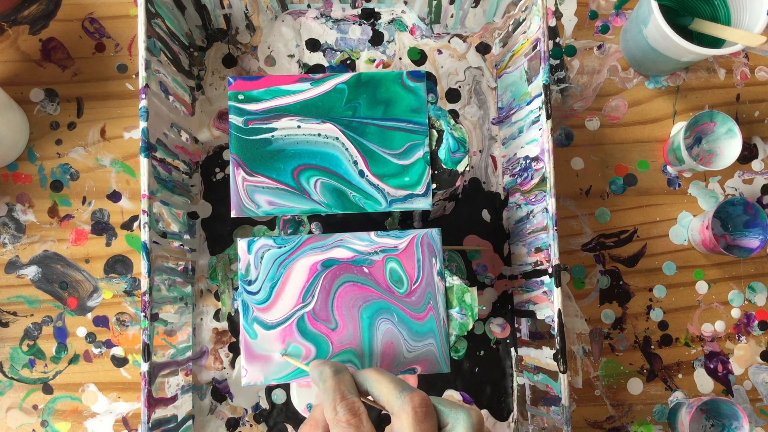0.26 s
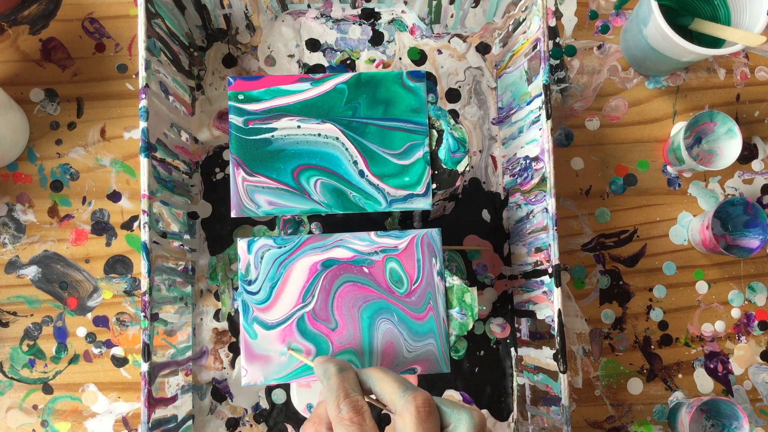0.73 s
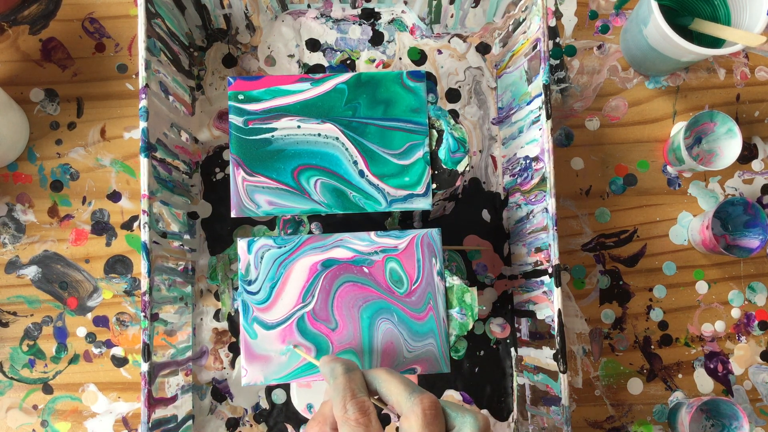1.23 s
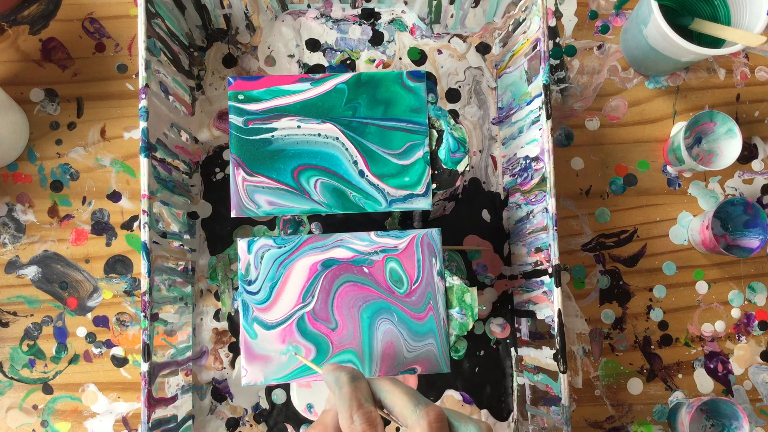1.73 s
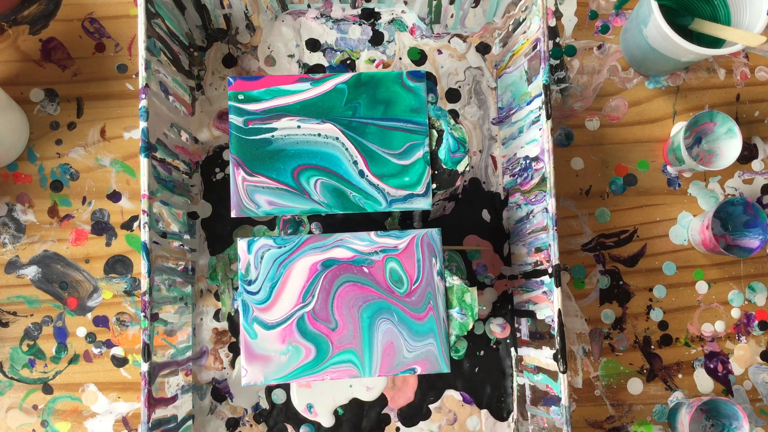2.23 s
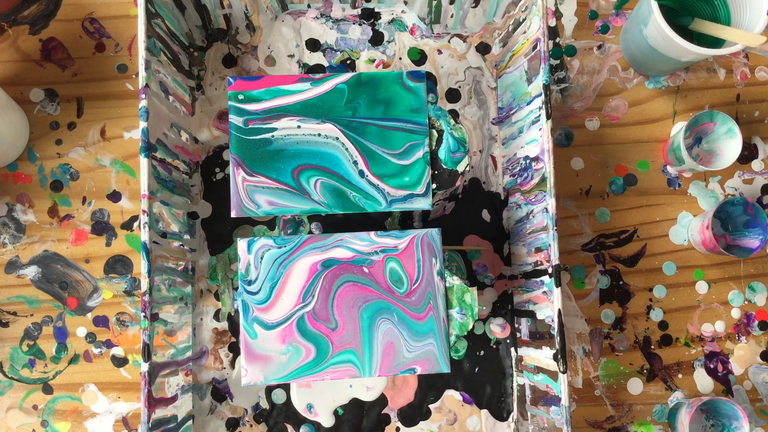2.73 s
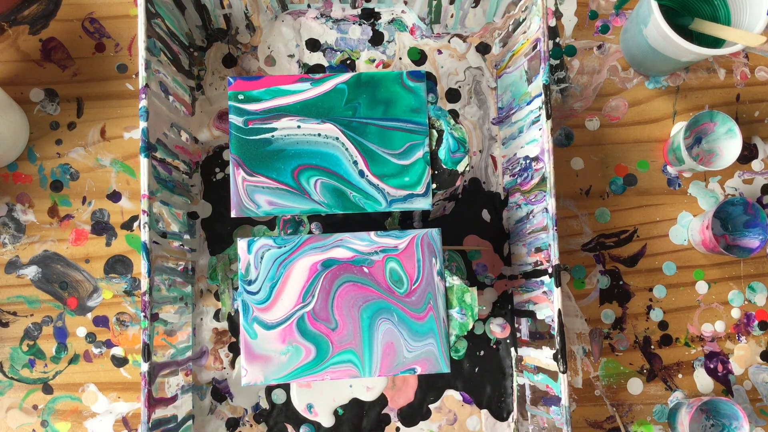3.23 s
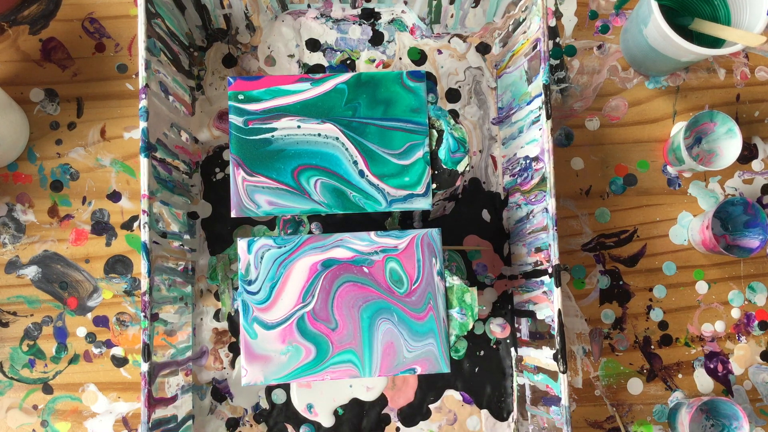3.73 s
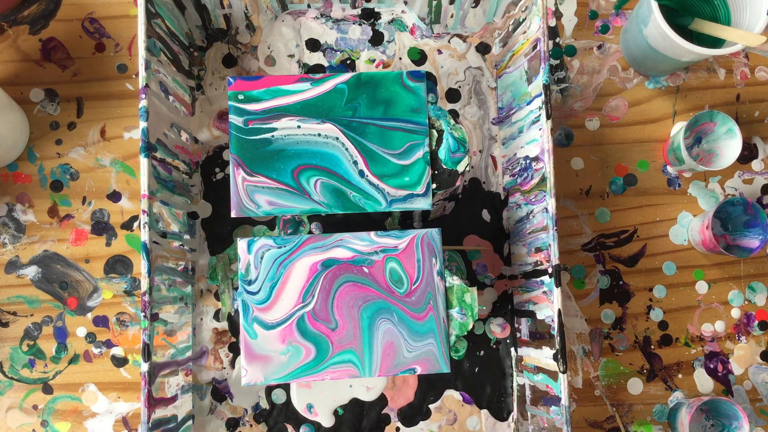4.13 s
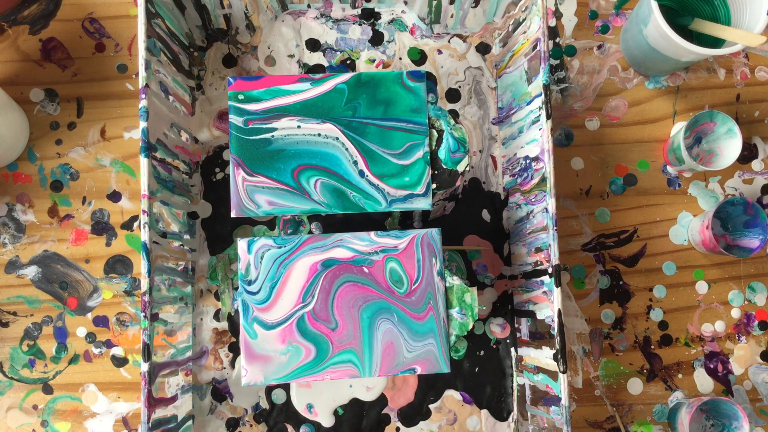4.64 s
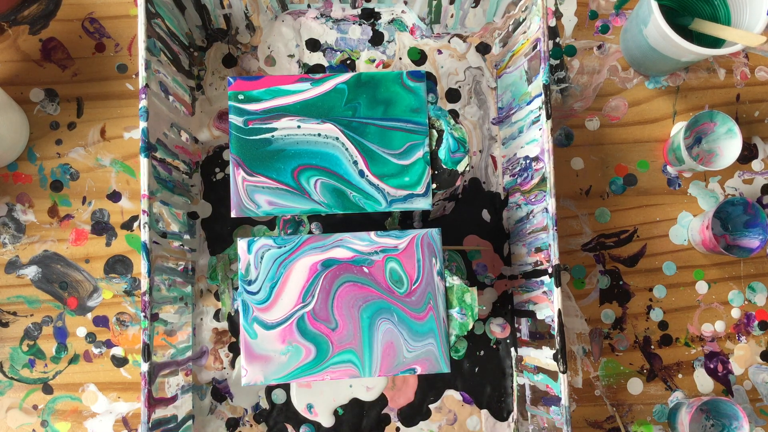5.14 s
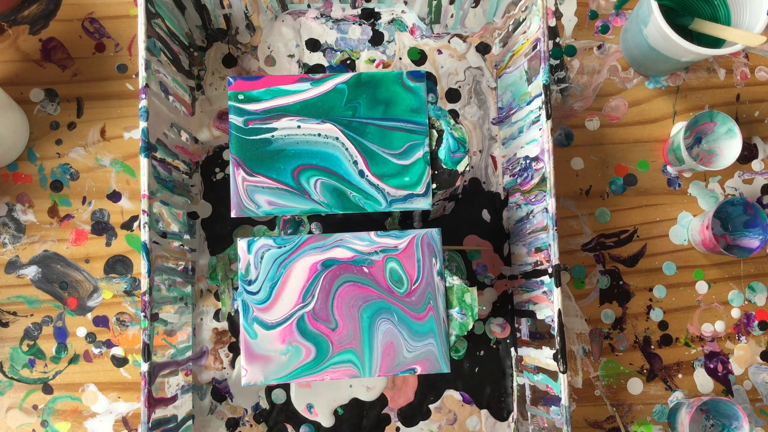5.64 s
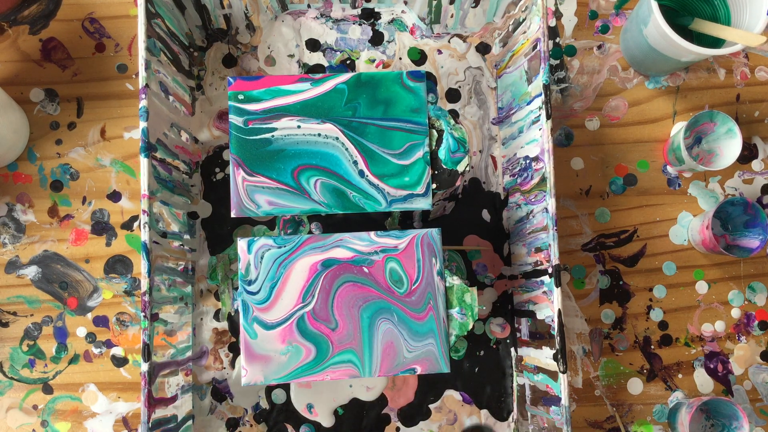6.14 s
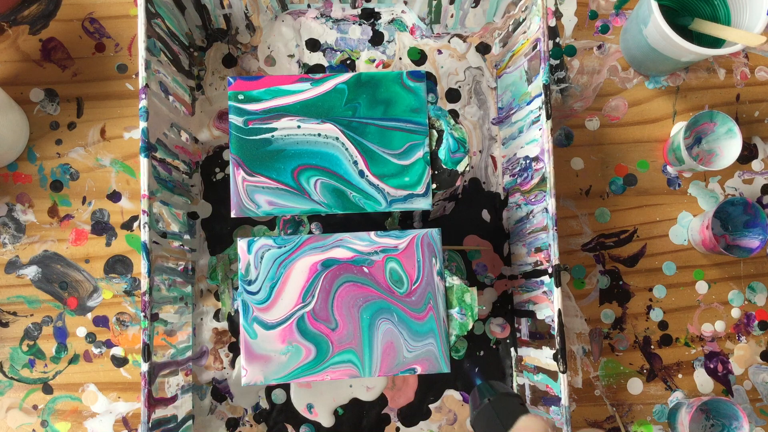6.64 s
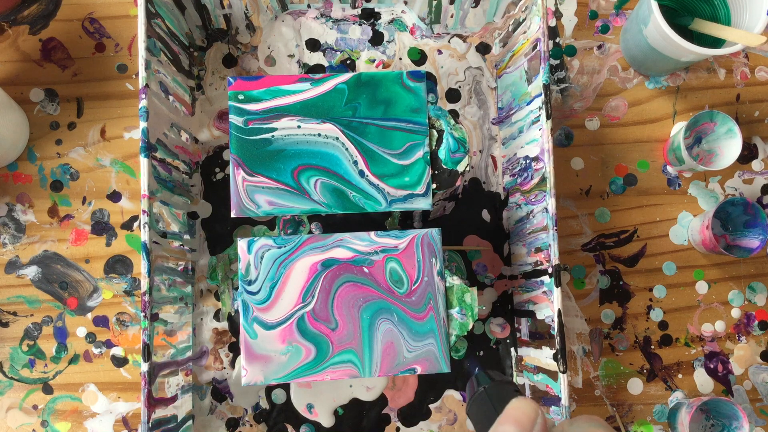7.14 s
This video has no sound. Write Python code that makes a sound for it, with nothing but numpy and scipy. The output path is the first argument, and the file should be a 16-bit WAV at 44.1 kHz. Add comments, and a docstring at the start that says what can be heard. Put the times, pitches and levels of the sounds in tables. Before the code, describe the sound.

In a quiet indoor craft space with a wavering low hum, a wooden stick knocks the table lightly twice and bounces. Small hard ticks follow as a gas torch is picked up, with barely audible finger scuffs and creaks of its casing. Then a very loud, sharp igniter snap lights the torch, which flares briefly and settles into a soft roar with thin hiss until the end. Close microphone, little room echo.

```python
"""A craft table in a quiet room with a wavering low hum, where a small gas torch is lit.
A stick knocks the table (dying sines); fingers scuff and creak on the torch (uneven noise, slips).
The trigger opens the gas, which hisses (coloured noise), and the spark hammer snaps (sharp blows
and ringing metal). The flame flares and settles (two coloured noises) over the hiss of the jet."""
import sys
import numpy as np
from scipy import signal
from scipy.io import wavfile
from scipy.ndimage import uniform_filter1d

SR = 44100
rng = np.random.default_rng(int(sys.argv[2]) if len(sys.argv) > 2 else 0)


def dump_mix(stems):
    """Bounce the given channels to the path in sys.argv[1] as a 16-bit WAV at rate SR."""
    frames = np.atleast_2d(stems).T  # one column per channel
    limited = np.clip(frames, -1, 1)  # hard clip at full scale
    pcm = np.round(limited * 32767).astype(np.int16)
    wavfile.write(sys.argv[1], SR, pcm)


def magnitude_from_level(level_db):
    """Linear magnitude for a level in decibels (20 dB per decade)."""
    exponent = np.asarray(level_db, float) / 20
    return 10 ** exponent


N = 325359  # length of the scene [samples]

# Still air: (frequency [Hz], level [dB per Hz])
AIR_COLOUR = [(18, -46), (34, -16), (60, -5), (85, -5.5), (147, -21), (181, -15), (212, -29), (339, -30),
              (451, -39), (585, -36.5), (911, -41), (1500, -42.5), (3000, -46.5), (6960, -50.5),
              (8200, -50.5), (9000, -47), (9800, -50.5), (15200, -50.5)]
# The wavering hum: (time [s], level [dB])
HUM_LEVEL = [(0, -70), (2.4, -68.5), (3.0, -63.5), (4.2, -66), (5.5, -73.5), (6.0, -85.5), (6.8, -68.5),
             (7.38, -72)]
# Low stirs of someone moving about: (loudest time [s], rise [s], fall [s], level [dB])
STIRS = [(1.67, 0.018, 0.058, -71), (3.51, 0.017, 0.27, -75), (4.35, 0.6, .6, -74.5),
         (5.66, 0.16, 0.049, -70)]
# Colour of those stirs: (frequency [Hz], level [dB per Hz])
STIR_COLOUR = [(60, -30), (120, 0), (250, -5), (400, -9), (600, -24), (900, -70)]
# Soft rustles of the moving hand and the trigger finger:
# (loudest time [s], rise [s], fall [s], level [dB])
RUSTLES = [(2.28, 0.24, 0.3, -81.5), (5.6, 0.19, 0.0494, -76)]
# Colour of those rustles: (frequency [Hz], level [dB per Hz])
RUSTLE_COLOUR = [(200, -50), (600, 0), (2200, -5), (4000, -15.5), (9000, -60.5)]
# How the room dies away: (frequency [Hz], time to fall 60 dB [s])
WALL_DECAY = [(100, 0.27), (400, 0.11), (1500, 0.43), (5000, 0.42), (10000, 0.35), (15000, 0.12)]
# A stick knocks the table twice and bounces: (time [s], level [dB], tilt [dB per octave],
# share of edge tick [ratio], table thud [Hz], thud level [dB])
STICK_TAPS = [(1.660, -55.5, 6, 0.2, 343, -54), (1.675, -75, 0, .05, 383, -63),
              (1.69, -63, 7, 0.03, 335, -74), (1.721, -66, 7, 0.03, 335, -78),
              (1.968, -52.5, 1, 0.35, 440, -60), (1.996, -59, 4, 0.03, 450, -76),
              (2.018, -67, 8, .03, 450, -80), (2.036, -66, 5, 0.03, 450, -80),
              (2.09, -80, -2, 0.05, 350, -67)]
# Tones of the stick: (frequency [Hz], level [dB], time to fall 60 dB [s])
STICK_TONES = [(560, -10, .03), (760, 0.5, 0.045), (950, -13, 0.034), (1190, -4, 0.06), (1270, -12, 0.03),
               (2250, -15, 0.025), (2730, -13, 0.022), (3550, -16, 0.02)]
# Dull bumps of the torch against the table: (time [s], level [dB], frequency [Hz])
BUMPS = [(3.016, -62, 1100), (3.508, -64, 900), (3.509, -65, 258), (3.523, -69, 750), (3.535, -67, 1100),
         (3.587, -73, 850)]
# Hard ticks of the torch being picked up:
# (time [s], peak level [dB], tilt [dB per octave], share of rattle [ratio])
TICKS = [(2.947, -63, -5, .6), (3.0142, -43, 0, 0.45), (3.5062, -60.5, -2.5, .5)]
# Colour of a hard tick: (frequency [Hz], level [dB per Hz])
TICK_COLOUR = [(410, -33), (700, -15), (1160, -6), (1600, -9), (2400, -9), (3000, -4), (4200, -4),
               (5000, -9), (7220, -7), (10500, -11), (12600, -6), (13200, -2), (13700, 5), (14200, -5),
               (15500, -25.5)]
# Fingers slide on the casing: (time [s], length [s], level [dB], tilt [dB per octave])
SCUFFS = [(3.512, .03, -75, -2), (3.635, .03, -75, 1), (3.675, .04, -74, 1.5), (3.782, .062, -71, 4),
          (4.085, .035, -82, 1.5), (4.49, .055, -78, -1), (4.63, .045, -82, -1.5), (4.86, .05, -79, -.3)]
# The casing creaks in the grip: (time [s], length [s], middle level [dB], nominal slips [per s])
CREAKS = [(3.65, .005, -78, 420), (3.697, .005, -79, 420), (4.307, .02, -73, 420), (4.478, .066, -74, 420),
          (4.628, .045, -72, 420), (4.85, .001, -57, 420)]
# Tones of the casing: (frequency [Hz], level [dB], time to fall 60 dB [s])
CASING_TONES = [(1560, 0, .035), (1680, -5, .025), (3000, -20, .012)]
# Scraping spring: (frequency [Hz], width [Hz], level [dB])
SPRING_BANDS = [(6400, 830, -0.5), (3950, 820, -3), (2720, 700, -6.5)]
# Sharp hammer blow: (frequency [Hz], level [dB per Hz])
SNAP_COLOUR = [(35, -45), (60, -28), (440, -27), (999, -20), (2000, -10), (2740, -9), (3890, -9),
               (4800, -16), (5150, -13), (6670, -2), (7320, -12.5), (11500, -6.5), (15100, -16.5),
               (15700, -56.5)]
# The blow in the plastic body: (frequency [Hz], level [dB per Hz])
BODY_COLOUR = [(35, -30), (60, 1), (250, 0), (480, 3), (850, -2), (1700, 2), (2500, -4), (5000, -40.5)]
# Ringing metal of the torch: (frequency [Hz], level [dB], time to fall 60 dB [s])
TORCH_TONES = [(2794, -2.5, 0.09), (3590, -11.5, 0.0717), (5940, 1, 0.035), (6840, -5, 0.06),
               (8397, -16.5, 0.13), (10610, -8.5, 0.029), (11440, -15.5, 0.062), (12330, -10, 0.056),
               (13250, -8.5, 0.0368)]
# Brief ping of the hammer pin: (frequency [Hz], level [dB], time to fall 60 dB [s])
PIN_TONES = [(12300, 0, .0035)]
# Hiss of the jet: (frequency [Hz], level [dB per Hz])
JET_COLOUR = [(2350, -40), (3050, -34), (3400, -16), (4000, -12.5), (4750, -7.5), (5090, 2), (5500, -8),
              (6470, -17.5), (7660, -20), (9960, -18.5), (15200, -23.5)]
# Thin top of the hiss: (frequency [Hz], level [dB per Hz])
JET_TOP_COLOUR = [(8000, -40), (9600, -17), (10600, -5.5), (12200, 0.5), (13600, -0.5), (15200, -5.5)]
# Cold gas in the air holes: (frequency [Hz], level [dB per Hz])
UNLIT_COLOUR = [(290, -31), (500, -2.5), (1030, -0.5), (1540, 3), (3400, -17.5), (5150, -6.5), (6210, -9),
                (6780, -7), (10000, -7.5), (13000, -39), (22000, -120)]
# The first flare of the flame: (frequency [Hz], level [dB per Hz])
FLARE_COLOUR = [(120, -48.5), (200, -14), (288, -14), (591, -11.5), (720, -2), (1020, -11.5), (1230, 1.5),
                (1400, -3.5), (1620, -10), (2050, -5.5), (2500, -11.5), (2800, -14), (3200, -12),
                (3900, -17), (9000, -30), (11700, -57.5), (19800, -120)]
# The settled flame: (frequency [Hz], level [dB per Hz])
SETTLED_COLOUR = [(88, -34), (150, -6), (183, -7.5), (211, -13.5), (268, -7.5), (317, -11.5), (360, -5.5),
                  (404, -11.5), (445, -7), (520, -19.5), (681, -2), (762, -2.5), (878, -1), (1120, -2),
                  (1250, -10), (1400, -4), (1590, -8), (1810, -2.5), (1970, -9.5), (2400, -15),
                  (2720, -8.5), (2960, -25.5), (3320, -15.5), (3610, -21.5), (4400, -25), (5720, -52),
                  (9680, -120)]

AIR_DB, STIR_REST_DB = -68, -85
HUM_HZ, HUM_WIDTH_HZ = 81.2, 7
SWELL_DB = 14  # a swell is this far under its top one rise before and one fall after it
TAIL_TURN_S = 0.005  # pace at which the three room tails take turns
THUD_T60_S, BUMP_T60_S, KNOCK_RISE_S = 0.057, 0.027, 0.0024
TICK_BURST_T60_S, TICK_TAIL_T60_S = 0.016, 0.23
TICK_TAIL_DB = -21.5  # relative to its tick
SLIP_SPREAD_DB = 2.5
VALVE_S, VALVE_OPENS_S, GAS_BUILDS_S = 5.594, 0.0096, 0.3
COLD_GAS_DB, LIT_GAS_DB = -73.5, -69.5  # start and end of the build-up
UNLIT_DB, JET_TOP_DB = 4, 5.5  # relative to the main hiss
JET_TOP_CLIMB_PER_S = 0.06  # the thin top slides up as the torch turns
CREEP_DB, CREEP_DB_PER_S, CREEP_HOLD_S = -34.5, 2600.5, 0.0061
HAMMER_S, HAMMER_DB, HAMMER_TILT_DB = 5.7058, -2.5, 2.5  # tilt per octave
CHATTER_FROM_S, CHATTER_TO_S = 0.001, 0.004  # after the blow
REBOUND_DB, REBOUND_TILT_DB = -12.5, 1  # middle values; each rebound strays from them
SNAP_RATTLE = 0.3  # share of rattle behind a blow
RING_DB, PIN_DB = -13.5, -4  # the ring is relative to the hammer
BODY_AFTER_S, BODY_DB = 0.0008, -17.5
FLARE_DB, SETTLED_DB = -53.5, -56
SETTLES_S, SETTLING_S, FLARE_LEFT = 5.99, 0.13, 0.01  # the last is a share of power
# the bands slide up as the torch moves over the table and its reflection shifts
FLARE_CLIMB_PER_S = 0.41
FLARE_DULLS_DB_PER_S = -28  # per octave above 4 kHz: the flare loses its treble first
FLUTTER_DB, FLUTTER_S, JET_FLUTTER_SHARE = 1.05, 0.04, 0.67
AWAY_S, AWAY_DB_PER_S = 5.77, -3  # the torch is turned aside and fades a little


def evened(x):
    """Scales a sound to an average strength (rms) of 1."""
    return x / np.sqrt(np.mean(x ** 2) + 1e-20)


def read(points, hz):
    """Reads a colour or decay table on a log-frequency axis."""
    f, value = np.transpose(points)
    return np.interp(np.log(hz + 1), np.log(f + 1), value)


def add(mix, s, sound):
    """Mixes a sound in at s seconds."""
    part = mix[round(s * SR):][:len(sound)]
    part += sound[:len(part)]


def noise(colour, patchy_db, size=1024, climb=0, dulls_db=0, moves_s=0):
    """Noise from random spectra with drifting patches; its colour may climb and dull after the blow."""
    hz = np.fft.rfftfreq(size, 1 / SR)[:, None]
    a, b, patches = rng.standard_normal((4 * N // size + 5, len(hz), 3)).T
    patches = uniform_filter1d(patches, size=10, axis=0)
    patches = evened(uniform_filter1d(patches, size=12, axis=1))
    frame_s = np.arange(a.shape[1]) * size / 4 / SR
    lit_s = np.clip(frame_s - HAMMER_S, 0, moves_s)
    dulled_db = dulls_db * lit_s * np.log2(np.maximum(hz, 4000) / 4000)
    level_db = read(colour, hz / (1 + climb * lit_s)) + dulled_db + patchy_db * patches
    spectra = (a + 1j * b) * magnitude_from_level(level_db)
    return evened(signal.istft(spectra, nperseg=size, noverlap=3 * size // 4)[1][:N])


def coloured(x, colour, tilt_db):
    """Filters without pre-echo: a colour, tilted per octave about 4 kHz (no further below 500 Hz)."""
    hz = abs(np.fft.fftfreq(4096, 1 / SR))
    log_gain = np.log(magnitude_from_level(read(colour, hz) + tilt_db * np.log2(np.maximum(hz, 500) / 4000)))
    minimum_phase = np.exp(np.conj(signal.hilbert(log_gain)))
    taps = np.fft.ifft(minimum_phase).real[:2048]
    return signal.fftconvolve(x, taps)


def ring(modes, tilt_db=0):
    """Dying sines of a struck thing, peak 1."""
    t = np.arange(SR // 4) / SR
    x = np.zeros(len(t))
    for hz, db, t60 in modes:
        fade = magnitude_from_level(db + tilt_db * np.log2(hz) - 60 * t / np.clip(t60, 0.0015, 0.3))
        x += fade * np.sin(2 * np.pi * hz * t)
    return x / abs(x).max()


def knock(modes, tilt_db=0):
    """A ring with the soft start of a dull blow."""
    x = ring(modes, tilt_db)
    return x * np.minimum(np.arange(len(x)) / SR / KNOCK_RISE_S, 1)


def crack(t60, colour, tilt_db, rattle):
    """One sharp blow with a little dying rattle behind it, peak 1."""
    t = np.arange(1000) / SR
    blow = rattle * rng.standard_normal(1000) * magnitude_from_level(-60 * t / t60)
    blow[0] = 1
    x = coloured(blow, colour, tilt_db)
    return x / abs(x).max()


def gritty(length, spread_db):
    """Noise that jumps in strength every 40 samples."""
    jumps = np.repeat(rng.exponential(1, length // 40), 40)
    return rng.standard_normal(length) * magnitude_from_level(spread_db * jumps)


def resonate(x, hz, width):
    """Picks out a band: shifts hz down to zero, smooths twice, shifts back."""
    turn = np.exp(2j * np.pi * hz * np.arange(len(x)) / SR)
    r = np.exp(-np.pi * width / SR)
    smooth = signal.lfilter([(1 - r) ** 2], [1, -2 * r, r * r], x / turn)
    return 2 * (turn * smooth).real


def swells(rows):
    """Gain of swells that rise and fall evenly in dB."""
    t = np.arange(N) / SR
    gain = np.zeros(N)
    for s, rise, fall, db in rows:
        gain += magnitude_from_level(db - SWELL_DB * np.maximum((s - t) / rise, (t - s) / fall))
    return gain


def still_air():
    """The faint steady noise of the room."""
    return magnitude_from_level(AIR_DB) * noise(AIR_COLOUR, 1.2, size=4096)


def low_hum():
    """A fuzzy hum: noise squeezed into a narrow band, wavering in level."""
    s, db = np.transpose(HUM_LEVEL)
    hum = evened(resonate(rng.standard_normal(N), HUM_HZ, HUM_WIDTH_HZ))
    return magnitude_from_level(np.interp(np.arange(N) / SR, s, db)) * hum


def movement():
    """Low swelling noise of someone moving about, and brighter rustles of hand and trigger finger."""
    stir = (magnitude_from_level(STIR_REST_DB) + swells(STIRS)) * noise(STIR_COLOUR, 4.01, size=2048)
    return stir + swells(RUSTLES) * noise(RUSTLE_COLOUR, 1.4)


def walls(x):
    """Three tails of sparse random taps take turns, each band dying at its own speed."""
    out = np.zeros(N)
    turn = np.pi * np.arange(N) / SR / TAIL_TURN_S
    for k in range(3):
        taps = np.zeros(SR // 2)
        at = np.arange(200, len(taps) - 10, 10)
        taps[at + rng.integers(0, 10, len(at))] = rng.choice([-1., 1.], len(at))
        hz, t, z = signal.stft(taps, SR, nperseg=256)
        fade = magnitude_from_level(-60 * t / read(WALL_DECAY, hz)[:, None])
        tail = signal.istft(z * fade, SR, nperseg=256)[1]
        share = np.sqrt(2 / 3) * abs(np.cos(turn + k * np.pi / 3))
        out += signal.oaconvolve(x * share, tail / np.linalg.norm(tail))[:N]
    return out


def stick_taps():
    """The stick rings, the table thuds and the stick's edge ticks."""
    out = np.zeros(N)
    for s, db, tilt_db, edge, thud_hz, thud_db in STICK_TAPS:
        add(out, s, magnitude_from_level(db) * knock(STICK_TONES, tilt_db))
        add(out, s, magnitude_from_level(thud_db) * knock([(thud_hz, 0, THUD_T60_S)]))
        add(out, s, magnitude_from_level(db) * edge * crack(0.018, TICK_COLOUR, -2.4, 0.8))
    return out


def bumps():
    """The torch bumps the table: one soft-starting, dying sine each."""
    out = np.zeros(N)
    for s, db, hz in BUMPS:
        add(out, s, magnitude_from_level(db) * knock([(hz, 0, BUMP_T60_S)]))
    return out


def ticks():
    """Sharp ticks of the torch, each followed by a bright, gritty tail that dies away."""
    out = np.zeros(N)
    for s, db, tilt_db, rattle in TICKS:
        add(out, s, magnitude_from_level(db) * crack(TICK_BURST_T60_S, TICK_COLOUR, tilt_db, rattle))
        grit = gritty(9000, 2.3)
        fade = magnitude_from_level(db + TICK_TAIL_DB - 60 * np.arange(9000) / SR / TICK_TAIL_T60_S)
        add(out, s, fade * evened(coloured(grit, TICK_COLOUR, tilt_db)[:9000]))
    return out


def scuffs():
    """Fingers rub the casing: short strokes of grit, as skin catches unevenly."""
    out = np.zeros(N)
    for s, length, db, tilt_db in SCUFFS:
        stroke = signal.windows.tukey(round(max(length, 0.005) * SR), 0.6)
        rub = coloured(gritty(8000, 2.1), [(300, -17), (1200, 2.5), (15000, -11.5)], tilt_db)
        add(out, s, magnitude_from_level(db) * stroke * evened(rub[3000:8000])[:len(stroke)])
    return out


def creaks():
    """Uneven stick-slip rings the casing."""
    out = np.zeros(N)
    # a soft pad of skin lets go
    release = np.hanning(90) * np.cos(2 * np.pi * CASING_TONES[0][0] * np.arange(90) / SR)
    slip = np.convolve(ring(CASING_TONES)[:2000], release)
    slip = slip / abs(slip).max()
    for s, length, db, rate in CREAKS:
        gap, size = rng.uniform(-1.2, 1, (40, 2)).T
        slips = np.cumsum(1 + 0.2 * gap) / rate
        for at, big in zip(slips - slips[0], size):
            if at < length:
                add(out, s + at, magnitude_from_level(db + SLIP_SPREAD_DB * big) * slip)
    return out


def spring():
    """The spring creeps: scraping noise in a few bands climbs, then holds until the blow."""
    before = HAMMER_S - np.arange(N) / SR
    creep = (before > 0) * magnitude_from_level(CREEP_DB - CREEP_DB_PER_S * np.maximum(before - CREEP_HOLD_S, 0))
    scrape = rng.standard_normal(N)
    bands = sum(magnitude_from_level(db) * resonate(scrape, hz, width) for hz, width, db in SPRING_BANDS)
    return creep * evened(bands)


def hammer():
    """The hammer cracks and chatters; the blow rings the metal, pings the pin and knocks the body."""
    out = np.zeros(N)
    late, size, tilt = rng.uniform(-1, 1, (6, 3)).T
    after = np.interp(np.arange(6) + 0.49 * late, [0, 5], [CHATTER_FROM_S, CHATTER_TO_S])
    rebounds = zip(after, REBOUND_DB + 3 * size, REBOUND_TILT_DB + 2.3 * tilt)
    for s, db, tilt_db in [(0.00066, HAMMER_DB, HAMMER_TILT_DB), *rebounds]:
        add(out, HAMMER_S + s, magnitude_from_level(db) * crack(0.004, SNAP_COLOUR, tilt_db, SNAP_RATTLE))
    add(out, HAMMER_S + BODY_AFTER_S, magnitude_from_level(BODY_DB) * crack(0.014, BODY_COLOUR, 0, 0.17))
    add(out, HAMMER_S, magnitude_from_level(HAMMER_DB + RING_DB) * ring(TORCH_TONES))
    add(out, HAMMER_S, magnitude_from_level(PIN_DB) * ring(PIN_TONES))
    return out


def gas_pop():
    """The gas pops alight: one low dying sine."""
    out = np.zeros(N)
    t = np.arange(4000) / SR
    add(out, HAMMER_S, magnitude_from_level(-46.5) * np.sin(2 * np.pi * 110 * t) * magnitude_from_level(-60 * t / 0.087))
    return out


def gas_jet(t, lit):
    """Gas hisses once the valve opens; the cold-gas noise goes as the flame lights."""
    opened = np.clip((t - VALVE_S) / VALVE_OPENS_S, 0, 1)
    built = np.clip((t - VALVE_S) / GAS_BUILDS_S, 0, 1)
    gas = opened * magnitude_from_level(COLD_GAS_DB + (LIT_GAS_DB - COLD_GAS_DB) * built)
    top = magnitude_from_level(JET_TOP_DB) * noise(JET_TOP_COLOUR, 1.2, climb=JET_TOP_CLIMB_PER_S, moves_s=N / SR)
    cold = magnitude_from_level(UNLIT_DB) * (1 - lit) * noise(UNLIT_COLOUR, 0.94)
    return gas * (noise(JET_COLOUR, 1.6) + top + cold)


def flame(t):
    """The roar flares, then gives way to the settled flame by sharing out power."""
    share = np.clip(1 - (t - SETTLES_S) / SETTLING_S, FLARE_LEFT, 1)
    flare = noise(FLARE_COLOUR, 1.2, climb=FLARE_CLIMB_PER_S, dulls_db=FLARE_DULLS_DB_PER_S,
                  moves_s=SETTLES_S + SETTLING_S - HAMMER_S)
    settled = noise(SETTLED_COLOUR, 1.5, size=2048)
    return magnitude_from_level(FLARE_DB) * np.sqrt(share) * flare + magnitude_from_level(SETTLED_DB) * np.sqrt(1 - share) * settled


def torch():
    """Jet and flame flicker together, the jet less, and fade a little as the torch turns aside."""
    t = np.arange(N) / SR
    lit = np.clip((t - HAMMER_S) / 0.03, 0, 1)
    away = magnitude_from_level(AWAY_DB_PER_S * np.maximum(t - AWAY_S, 0))
    drift = uniform_filter1d(rng.standard_normal(N), round(FLUTTER_S * SR))
    flutter = magnitude_from_level(FLUTTER_DB * evened(drift))
    return away * (gas_jet(t, lit) * flutter ** JET_FLUTTER_SHARE + lit * flutter * flame(t))


def scene():
    """Sharp sounds reach the walls; the steady ones already carry the room."""
    background = still_air() + low_hum() + movement()
    hand = stick_taps() + bumps() + ticks() + scuffs()
    creak = creaks()
    snap = spring() + hammer() + gas_pop()
    echo = walls(magnitude_from_level(-9.5) * hand + magnitude_from_level(-12) * creak + magnitude_from_level(-14) * snap)
    return (background + hand + creak + snap + echo + torch())[None]


def top_cut(x):
    """Nothing passes above the cut-off."""
    return signal.sosfilt(signal.butter(12, 16390, fs=SR, output="sos"), x)


def record(dry):
    """The microphone drops the deepest bass (below 35 Hz) and most of the top (above 15330 Hz)."""
    edge_hz = 15330
    top_filter = signal.firwin2(1023, [0, edge_hz, edge_hz + 60, SR / 2],
                                [1, 1, magnitude_from_level(-24), magnitude_from_level(-24)], fs=SR)
    bass_filter = signal.butter(2, 35, "high", fs=SR, output="sos")
    clear = signal.sosfilt(bass_filter, dry)
    mix = signal.oaconvolve(clear, top_filter[None], "same")
    return top_cut(mix)


dry = scene()
out = record(dry)
dump_mix(out)
```